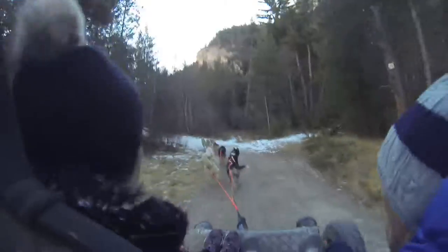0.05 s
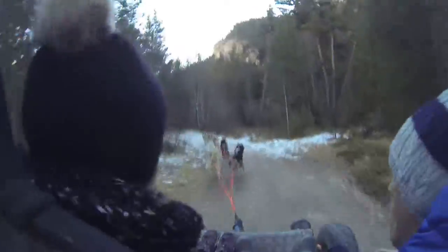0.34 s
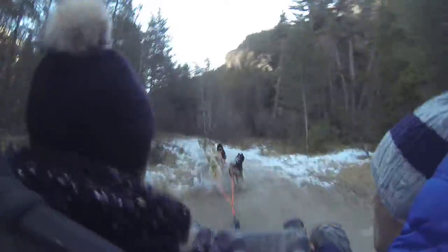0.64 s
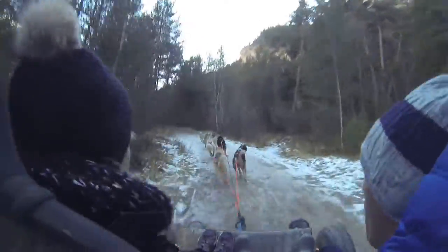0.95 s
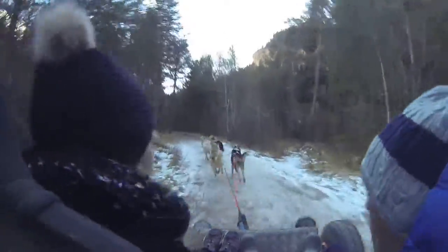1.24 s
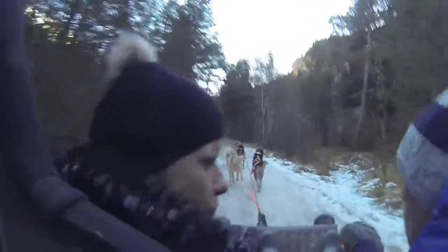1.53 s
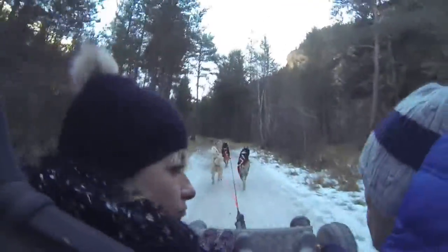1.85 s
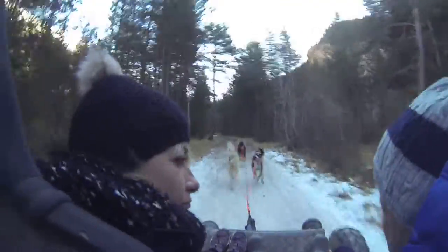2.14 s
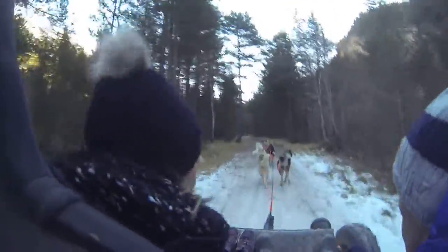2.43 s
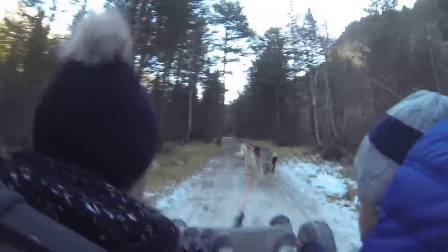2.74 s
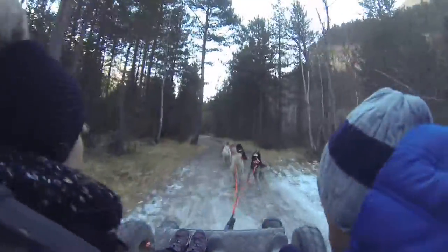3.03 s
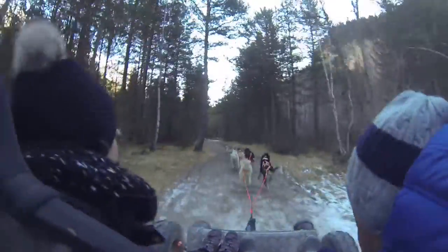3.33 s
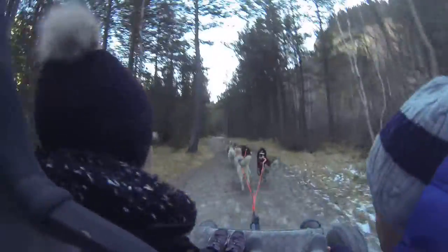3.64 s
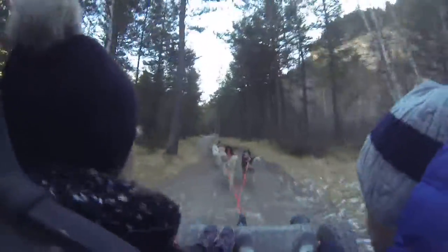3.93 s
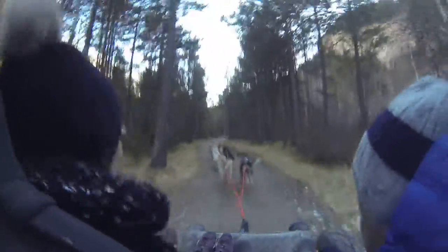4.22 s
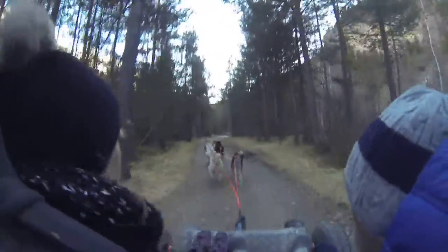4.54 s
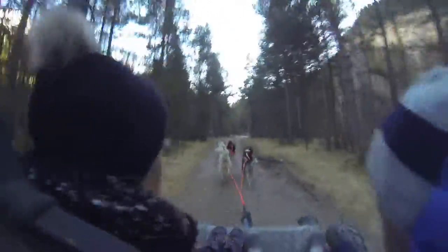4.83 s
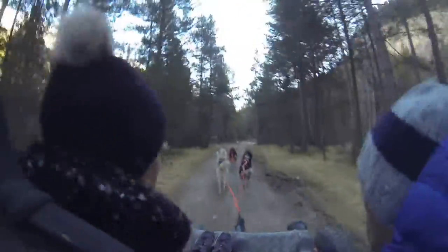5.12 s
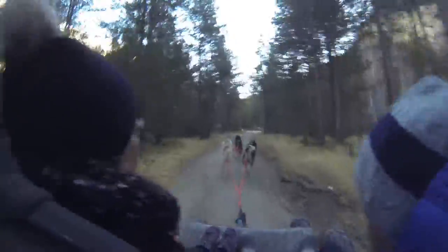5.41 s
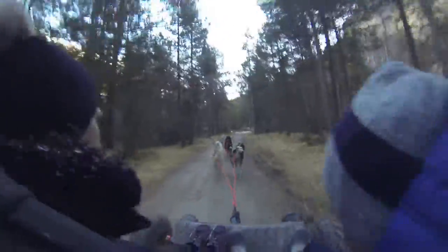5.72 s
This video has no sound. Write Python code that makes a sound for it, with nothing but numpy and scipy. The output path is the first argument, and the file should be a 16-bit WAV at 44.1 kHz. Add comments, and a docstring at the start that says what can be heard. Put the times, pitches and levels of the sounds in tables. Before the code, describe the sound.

Heard from a seat on a moving cart, a deep, continuous drone of wheels on a frozen gravel trail fills the sound. Short, hard clacks and light rattles from loose parts come in uneven clusters, a little stronger in the second half, along with dull thumps from the jolts. The tyres hiss softly and crunch over small stones. The sound is close and dry, outdoors in a forest.

```python
"""A low drone with knocking and chatter above it: a dog-drawn cart rolls at an even pace along a frozen gravel
track, heard from on board. The tyres force the frame into resonance over the slower sway of the chassis. Hard
knocks ring out in damped modes, and grit ticks under the hissing tyres. The ride gives low thumps, with a short
dry crackle at the peak of each jolt."""
import sys
import numpy as np
from scipy import signal
from scipy.fft import rfft, irfft, next_fast_len
from scipy.io import wavfile
from scipy.ndimage import map_coordinates

SR = 44100
rng = np.random.default_rng(int(sys.argv[2]) if len(sys.argv) > 2 else 0)


def waveform_to_disk(signal):
    """Save audio, clipped to [-1, 1], as 16-bit WAV at the path in sys.argv[1]."""
    frames = np.transpose(np.atleast_2d(signal))
    scaled = np.clip(frames, -1, 1) * 32767
    samples = np.round(scaled).astype(np.int16)
    wavfile.write(sys.argv[1], SR, samples)


N = 258859

# roughness of the track, as the chatter it excites: (time [s], level [dB])
ROUGHNESS = [(0.0, -43), (0.13, -47.5), (0.23, -50.5), (0.57, -50.5), (0.62, -49.5), (1.08, -50),
             (1.39, -41), (1.57, -51), (1.7, -46.5), (2.4, -49.5), (2.97, -51), (3.28, -43), (3.66, -54),
             (3.99, -45), (4.07, -45.5), (4.79, -44), (4.84, -46), (5.17, -45), (5.25, -54), (5.38, -54),
             (5.66, -47), (5.87, -34.5)]
# spectrum of the frame's drone: (frequency [Hz], relative level [dB])
DRONE_SPECTRUM = [(55, -14), (75, -15), (88, -7), (100, -9.5), (120, -2.5), (143, 1.5), (165, -10.5),
                  (195, -23.5), (260, -35.5), (320, -36.5), (400, -46), (700, -55), (1500, -96.5),
                  (3000, -140)]
# spectrum of the chassis' sway: (frequency [Hz], relative level [dB])
SWAY_SPECTRUM = [(5, -24), (14, 13), (26, 7), (38, 5.5), (52, -9.5), (90, -36.5), (200, -82.5), (600, -140)]
# spectrum of the tyres' hiss: (frequency [Hz], relative level [dB])
HISS_SPECTRUM = [(200, -2), (400, -14.5), (900, 7.5), (2500, -1), (3600, -29.5), (6000, -27), (8500, -42),
                 (11000, -61), (16000, -80.5)]
# spectrum of small grains breaking: (frequency [Hz], relative level [dB])
GRAIN_SPECTRUM = [(300, -19), (1500, -4), (3500, 2.5), (5000, -5), (7500, -11), (10000, -16.5),
                  (13000, -32.5), (16000, -44)]
# colour of the dry crackle at the peaks of jolts and wide swings: (frequency [Hz], gain [dB])
CRACKLE_SPECTRUM = [(200, 3.5), (500, 10.5), (1000, 12), (3200, 6.5), (4500, -1.5), (7000, -9),
                    (10000, -17), (13000, -23.5), (16000, -37)]
# normal modes that ring in the knocks and chatter: (frequency [Hz], relative level [dB], nominal 60 dB decay
# time [s])
RATTLE_MODES = [(333, -15.5, 0.079), (461, -18.5, 0.077), (615, -15.5, 0.047), (830.5, -9, 0.065),
                (898.5, -13, 0.067), (1159.5, -4.5, 0.033), (1470, -2, 0.039), (1617, 0, 0.021),
                (1740, -3, 0.041), (1899, -2.5, 0.022), (2110, -2, 0.015), (2348, -10.5, 0.033),
                (2637, -14.5, 0.026), (2944, -15, 0.017), (3184, -21, 0.024), (4100, -36, 0.025),
                (4550, -38.5, 0.019), (4930, -28, 0.0094), (6360, -30, 0.0061)]
# jolts of the ride: (time [s], crackle level before colouring [dB], relative thump level [dB])
JOLTS = [(0.039, -56.5, -6.5), (0.099, -52, 1), (0.222, -54, 0), (0.454, -57, -12.5), (0.596, -58.5, -19),
         (0.633, -54.5, -9), (0.806, -54, -13), (1.103, -53, 0), (1.173, -59, -4.5), (1.261, -53.5, -3),
         (1.407, -53, -4.5), (1.496, -46, 3), (1.615, -57.5, -1), (1.737, -54.5, -3.5), (2.04, -53, -1),
         (2.146, -54, -4), (2.266, -56.5, 0.5), (2.305, -47, -0.5), (2.633, -56, -7), (2.735, -51.5, -5),
         (2.971, -58, -8.5), (3.143, -55.5, -4.5), (3.242, -62, -4), (3.505, -52.5, -1.5), (3.663, -50, 2),
         (3.878, -51.5, -2), (4.169, -53, -0.5), (4.252, -49.5, 0.5), (4.531, -55, 1.5),
         (4.624, -48.5, -3.5), (4.638, -42, -4.5), (4.647, -51, -18), (4.768, -55, -8), (5.075, -50.5, 2),
         (5.187, -54, 1), (5.37, -48.5, -3.5), (5.428, -49.5, -1.5), (5.54, -54, -3.5), (5.658, -55.5, -8)]
# hard knocks, by family of modes: (time [s], nominal middle peak [dB], favoured frequency [Hz], hollow level
# [dB], bright level [dB], clinking level [dB])
KNOCK_IMPACTS = [(0.0968, -31, 1550, -49, -47, -43), (0.2283, -24, 1450, -35.5, -40.5, -51),
                 (0.2854, -28, 1590, -51, -47, -44), (0.4689, -22, 1500, -44, -35, -33.5),
                 (0.4845, -28.5, 1450, -48, -52, -46), (0.6335, -29, 1460, -50.5, -40.5, -45),
                 (1.102, -24, 1415, -53, -43.5, -56), (1.238, -24.5, 1700, -41, -36.5, -55),
                 (1.262, -19, 1770, -31, -42, -52), (1.2968, -18, 1580, -30, -40, -46.5),
                 (1.3731, -23.5, 1600, -30, -37.5, -50), (1.4107, -24, 1470, -37, -35, -35),
                 (1.489, -23.5, 1890, -36, -39.5, -54), (1.604, -25, 1890, -38, -27.5, -41.5),
                 (1.6805, -25, 1480, -39, -48, -52), (1.723, -19.5, 1530, -50, -35.5, -34.5),
                 (2.0349, -15.5, 1820, -21.5, -44, -41.5), (2.4072, -25.5, 1690, -42, -42.5, -60),
                 (2.6989, -15, 1790, -23.5, -50, -43), (3.0184, -18, 1760, -25, -48, -42.5),
                 (3.3121, -24, 1430, -30.5, -34.5, -43), (3.3508, -36, 1710, -43, -37.5, -45),
                 (3.4053, -17, 1600, -32, -33, -43), (3.4208, -14.5, 1580, -32, -32, -38),
                 (3.48, -22, 1580, -34, -39, -55), (3.6187, -23, 1560, -37.5, -40.5, -51),
                 (3.6591, -15, 1570, -28, -22, -46), (3.9107, -26.5, 1770, -31, -52.5, -56),
                 (3.957, -23.5, 1610, -36.5, -41, -38), (4.0488, -23, 1490, -61, -46, -61),
                 (4.1287, -20.5, 1860, -47, -41, -58), (4.1599, -13, 1810, -38.5, -27, -30),
                 (4.5494, -16.5, 1530, -31, -48, -49), (4.5749, -16.5, 1800, -31.5, -49, -42),
                 (4.6422, -19, 1540, -41, -44, -29), (4.68, -23.5, 1500, -50, -55, -47),
                 (4.8249, -21.5, 1520, -37.5, -32.5, -46), (4.8538, -24.5, 1630, -35.5, -46, -55),
                 (5.035, -24.5, 1670, -44, -48, -56), (5.1097, -22.5, 1720, -52.5, -38.5, -36),
                 (5.3403, -10.5, 1680, -21, -44, -41), (5.3502, -27, 1630, -37, -45, -39),
                 (5.4542, -20, 1490, -49, -58, -64.5), (5.5248, -25, 1556, -57, -46, -49)]

DRONE_DB, SWAY_DB, WAVER_DB = -19.5, -20, 2.5  # uneven ground makes both levels waver
CRACKLE_DB, CRACKLE_ABOVE_RMS = -67, 2.25
GRIT_DB, GRIT_DB_PER_ROUGHNESS_DB = -68.5, 0.99
FLURRY_DB, FLURRY_S = -27.5, 0.052  # jiggling around a knock: relative level, time constant
TAPS_PER_S, TAP_DB, TAP_SCATTER_DB = 4, 11, 2.5  # rate on average track; level above the roughness
FAVOUR_DB, FAVOUR_WIDTH_HZ = 8, 140  # the point of impact favours the modes near one frequency
CONTACT_S, CREST_DB = 0.0043, 6.5  # a blow's contact time and nominal peak over rms
MIDDLE, FAMILY_EDGES_HZ = 1, [1350, 2050, 2620]  # families 0-3: hollow, middle, bright, clinking
TOP_HZ = 15800


def amp(db):
    """Decibels to amplitude ratio."""
    return 10 ** (np.asarray(db) / 20)


def unit(x):
    """The signal scaled to rms 1."""
    return x / np.sqrt(np.mean(x ** 2) + 1e-20)


def wobble(rate):
    """A smooth random curve with rate knots a second."""
    return map_coordinates(rng.standard_normal(int(N * rate / SR) + 4), [np.arange(N) * rate / SR])


def filtered(x, response):
    """Linear filtering: the spectrum of x is multiplied by a frequency response."""
    size = next_fast_len(len(x) + 8192)
    return irfft(rfft(x, size) * response(np.fft.rfftfreq(size, 1 / SR)), size)[:len(x)]


def coloured(x, spectrum):
    """Spectral shaping by (frequency [Hz], gain [dB]) points joined on a log axis."""
    points_hz, db = np.transpose(spectrum)
    return filtered(x, lambda hz: amp(np.interp(np.log(hz + 1), np.log(points_hz), db)))


def add(track, s, sound):
    """Superposition: a sound joins the track from time s."""
    start = max(round(s * SR), 0)
    track[start:start + len(sound)] += sound[:max(len(track) - start, 0)]


def shaking(spectrum, span_s):
    """Random vibration whose power stays even over stretches of span_s."""
    noise = coloured(rng.standard_normal(N), spectrum)
    power = np.abs(signal.fftconvolve(noise ** 2, np.hanning(int(span_s * SR) + 3), "same"))
    return unit(noise / np.sqrt(power + 1e-12))


def contacts(rate, spread_db):
    """A Poisson process: rate impulses a second, of log-normal size and either sign."""
    hits = rng.random(N) < rate / SR
    sizes = amp(spread_db * np.clip(rng.standard_normal(N), -2, 2))
    return hits * sizes * rng.choice([-1, 1], N)


def ring(modes, scatter_db, damping):
    """Free vibration: each mode, slightly detuned and of random strength, decays exponentially."""
    t = np.arange(SR // 10) / SR
    hz, db, t60 = np.transpose(modes)[:, :, None]
    hz = hz * (1 + 0.015 * rng.standard_normal(hz.shape))
    envelopes = amp(db + scatter_db * rng.standard_normal(hz.shape) - 60 * damping * t / t60)
    onset = 1 - np.exp(-(t / .0011) ** 2)
    return onset * np.sum(envelopes * np.sin(2 * np.pi * (hz * t + rng.random(hz.shape))), 0)


def blow(ring_hz, family):
    """Impact excitation of one family of modes, with the energy of rms 1 held for the contact time."""
    t = np.arange(SR // 10) / SR
    hz, db, t60 = np.transpose(RATTLE_MODES)
    favour_db = FAVOUR_DB * np.exp(-((hz - ring_hz) / FAVOUR_WIDTH_HZ) ** 2)
    modes = np.column_stack([hz, db + favour_db, t60])
    in_family = np.digitize(hz, FAMILY_EDGES_HZ) == family
    contact = 1 + 0.24 * np.exp(-(t / CONTACT_S) ** 4)
    sound = contact * ring(modes[in_family], scatter_db=3.5, damping=1.2)
    return sound / np.sqrt(np.sum(sound ** 2) / (CONTACT_S * SR))


def grit(rough_db):
    """Brittle fracture: grains crunch under the tyres in bursts of tiny cracks, louder on rough track."""
    grains = contacts(rate=220, spread_db=6) * amp(2.5 * wobble(rate=9))
    decay = np.exp(-np.arange(SR // 100) / SR / .0008)
    crush = signal.fftconvolve(grains, decay)[:N]
    fractures = contacts(rate=16000, spread_db=3)
    level_db = GRIT_DB + GRIT_DB_PER_ROUGHNESS_DB * (rough_db - rough_db.mean())
    return amp(level_db) * unit(coloured(crush * fractures, GRAIN_SPECTRUM))


def crackle(vibration):
    """A threshold nonlinearity: a soft, dry crackle rides on the crests of the frame's widest swings."""
    excess = np.maximum(np.abs(unit(vibration)) - CRACKLE_ABOVE_RMS, 0)
    bursts = np.sqrt(excess) * rng.standard_normal(N)
    return amp(CRACKLE_DB) * unit(coloured(bursts, CRACKLE_SPECTRUM))


def tyre_hiss():
    """Rolling noise: the tyres give a broadband hiss."""
    return amp(-7.5) * unit(coloured(rng.standard_normal(N), HISS_SPECTRUM))


def chatter():
    """Rattling contact: twenty rattles jiggle in short fits, ringing mostly the middle modes."""
    hz, db, t60 = np.transpose(RATTLE_MODES)
    light_modes = np.column_stack([hz, db - 4.3 * np.abs(np.log2(hz / 1600)), t60])
    touches = [contacts(rate=13, spread_db=6) for _ in range(20)]
    ringing = sum(signal.fftconvolve(touch, ring(light_modes, scatter_db=4.0, damping=.9))[:N]
                  for touch in touches)
    fits = amp(2.8 * wobble(rate=30))
    return unit(fits * ringing)


def agitation(rough_db):
    """Power summation: roughness and a flurry around each knock set the gain of chatter and hiss."""
    t = np.arange(N) / SR
    flurries = [amp(db + FLURRY_DB) * np.exp(-np.abs(t - s) / FLURRY_S) for s, db, *_ in KNOCK_IMPACTS]
    return np.hypot(amp(rough_db), np.max(flurries, 0))


def taps(rough_db):
    """Random impacts: light knocks of varying pitch come more often and harder on rough track."""
    out = np.zeros(N)
    rate = TAPS_PER_S * amp(rough_db - rough_db.mean())
    for i in np.flatnonzero(rng.random(N) < rate / SR):
        level_db = rough_db[i] + TAP_DB + TAP_SCATTER_DB * rng.standard_normal()
        add(out, i / SR, amp(level_db) * blow(ring_hz=rng.uniform(1430, 1900), family=MIDDLE))
    return out


def shove(t, width_s):
    """A pulse of zero net impulse: a push at t = 0 with a recoil on either side."""
    u = t / width_s
    return (1 - 2 * u ** 2) * np.exp(-u ** 2)


def jolts():
    """Impulsive forcing: each jolt of the ride is a low thump, with a short dry crackle at its peak."""
    thumps, crackles = np.zeros(N), np.zeros(N)
    t = np.arange(-SR // 50, SR // 50) / SR
    hard_core = amp(-14.5) * shove(t, width_s=0.0016)
    thump = shove(t, width_s=0.0033) + hard_core
    for s, crackle_db, thump_db in JOLTS:
        add(thumps, s + t[0], amp(thump_db - 8) * rng.choice([-1, 1]) * thump)
        burst = rng.standard_normal(len(t)) * np.exp(-(t / 0.0017) ** 2)
        add(crackles, s + t[0], amp(crackle_db) * unit(burst))
    return thumps + coloured(crackles, CRACKLE_SPECTRUM)


def knocks():
    """Modal superposition: where each blow strikes sets how much each family of modes rings."""
    out = np.zeros(N)
    for s, peak_db, ring_hz, hollow_db, bright_db, clink_db in KNOCK_IMPACTS:
        levels_db = [hollow_db, peak_db - CREST_DB, bright_db, clink_db]
        add(out, s, sum(amp(db) * blow(ring_hz, family) for family, db in enumerate(levels_db)))
    return out


def frame():
    """Forced vibration: the tyres drive the frame's low resonance while the chassis sways beneath it."""
    drone_db = DRONE_DB + WAVER_DB * wobble(rate=16)
    sway_db = SWAY_DB + WAVER_DB * wobble(rate=6)
    drone = amp(drone_db) * shaking(DRONE_SPECTRUM, span_s=0.29)
    sway = amp(sway_db) * shaking(SWAY_SPECTRUM, span_s=0.18)
    return drone + sway


def scene():
    """Free field: every source reaches the listener directly, with no echo in the open forest."""
    rough_db = np.interp(np.arange(N) / SR, *np.transpose(ROUGHNESS))
    vibration = frame()
    cart = vibration + crackle(vibration) + knocks()
    rolling = agitation(rough_db) * (chatter() + tyre_hiss())
    return (cart + rolling + jolts() + grit(rough_db) + taps(rough_db))[None]


def record(dry):
    """Band limiting: nothing above TOP_HZ passes; the sound eases in and out over a few milliseconds."""
    fades = signal.windows.tukey(N, .002)
    return np.array([filtered(x * fades, lambda hz: hz < TOP_HZ) for x in dry])


dry = scene()
out = record(dry)
waveform_to_disk(out)
```